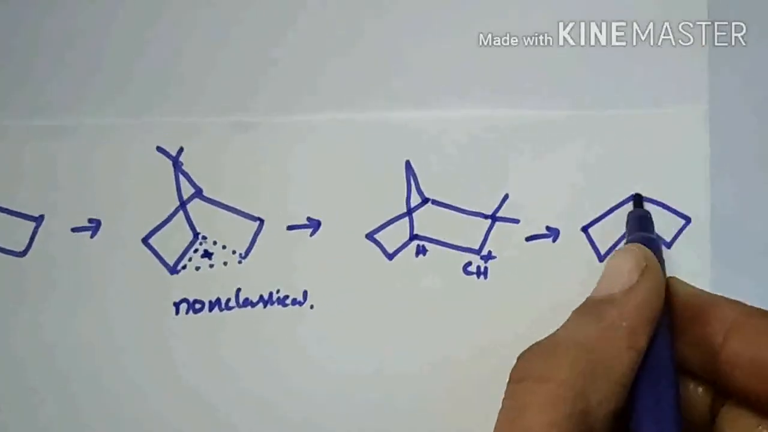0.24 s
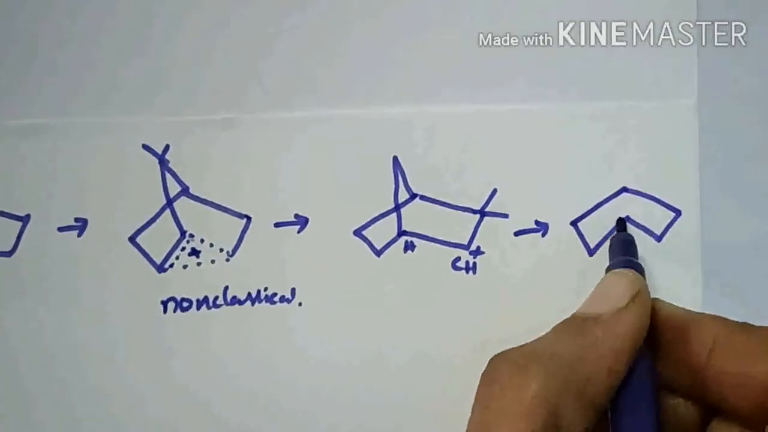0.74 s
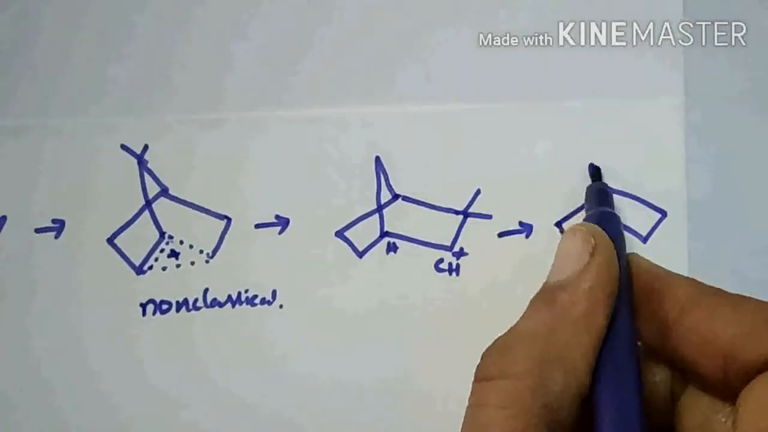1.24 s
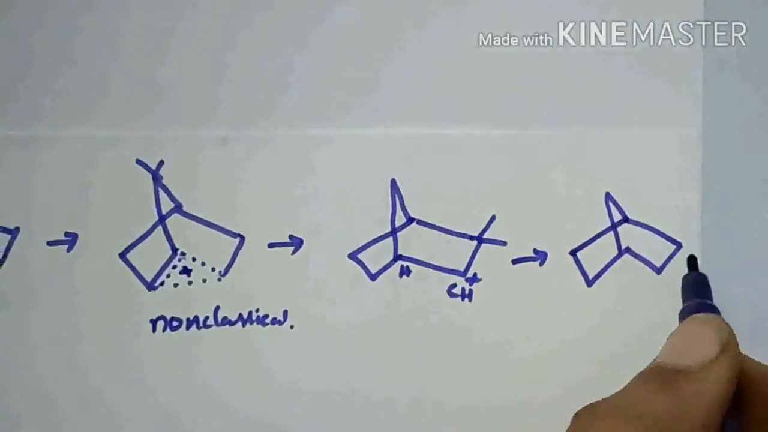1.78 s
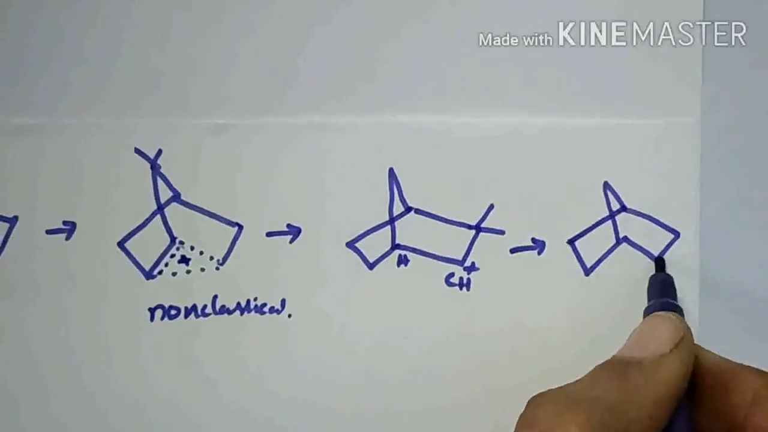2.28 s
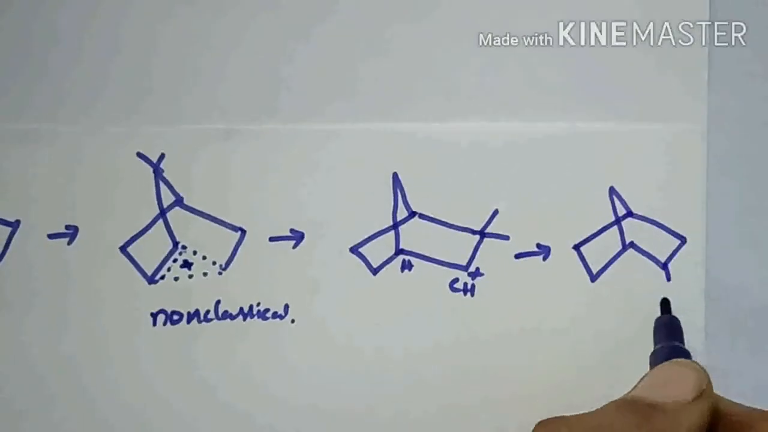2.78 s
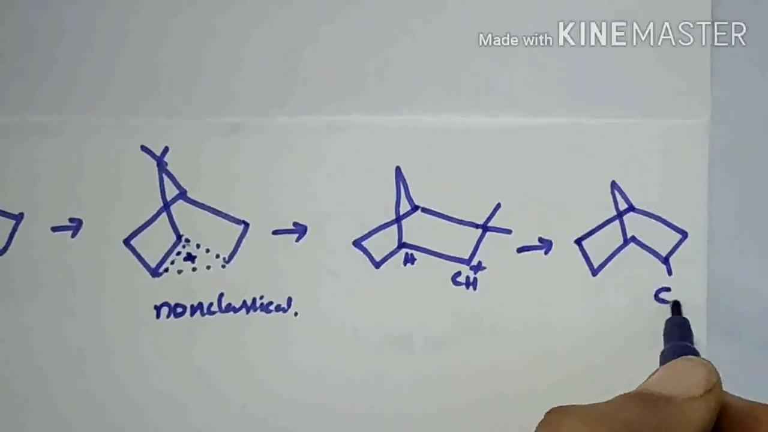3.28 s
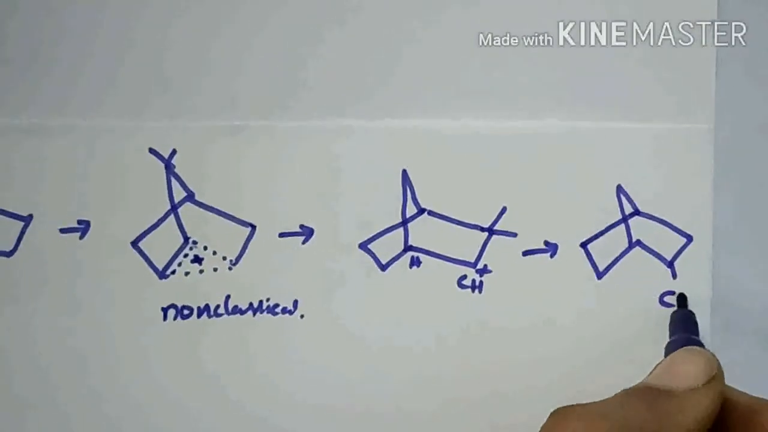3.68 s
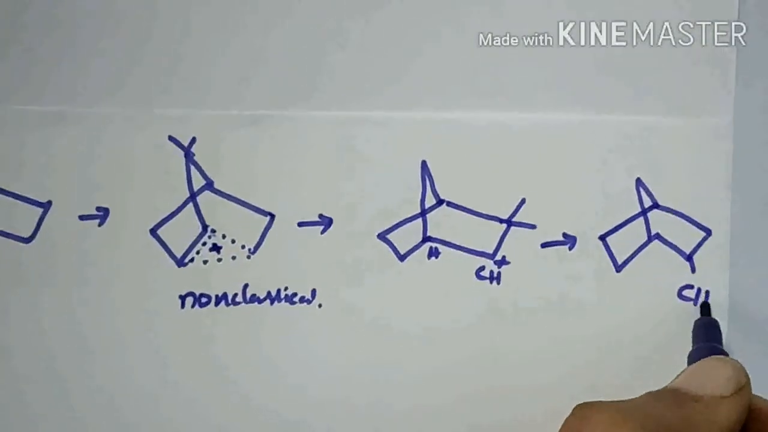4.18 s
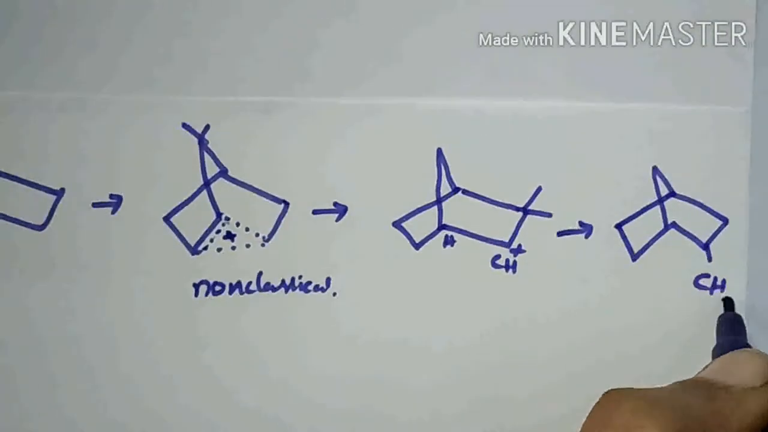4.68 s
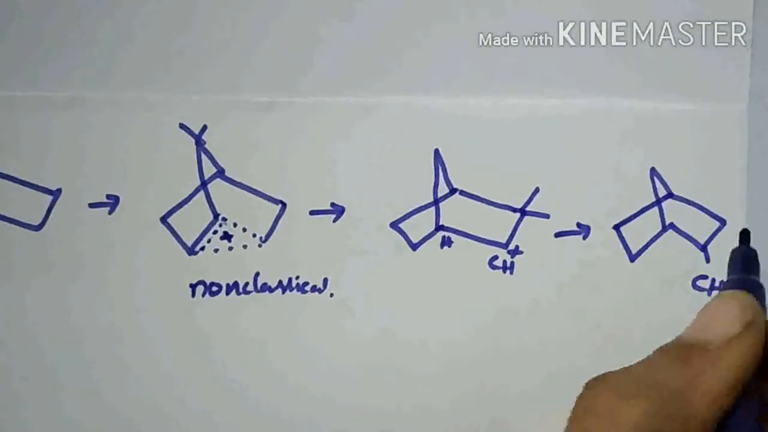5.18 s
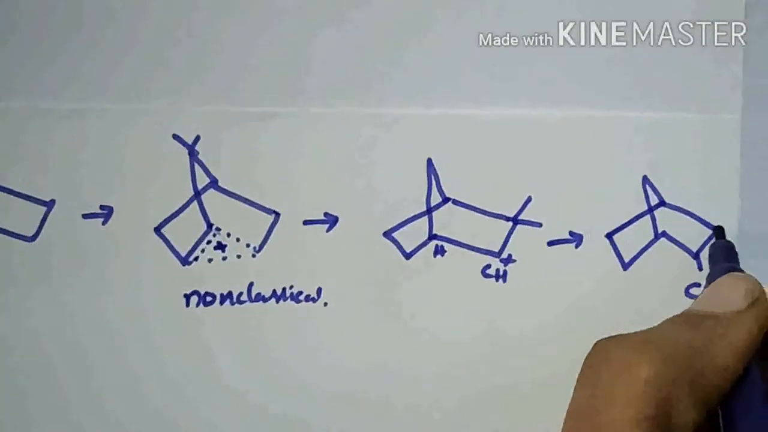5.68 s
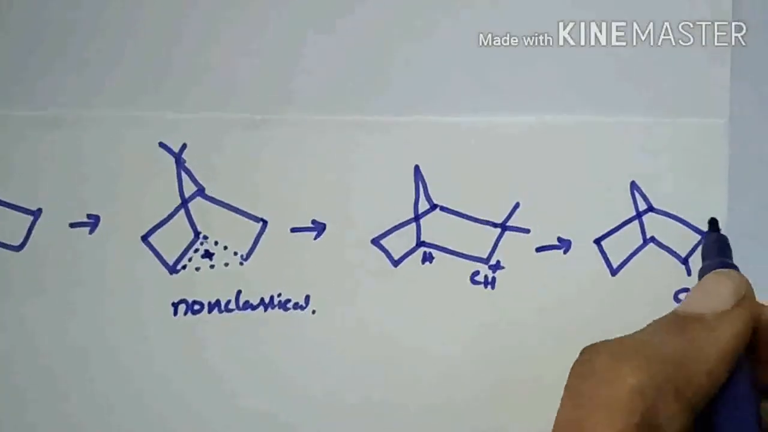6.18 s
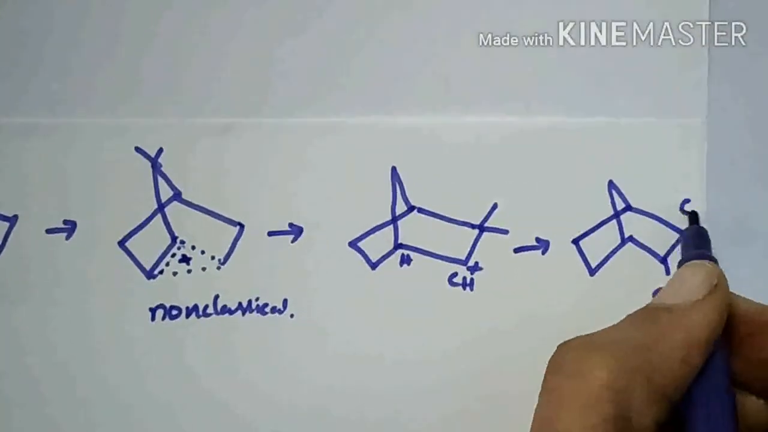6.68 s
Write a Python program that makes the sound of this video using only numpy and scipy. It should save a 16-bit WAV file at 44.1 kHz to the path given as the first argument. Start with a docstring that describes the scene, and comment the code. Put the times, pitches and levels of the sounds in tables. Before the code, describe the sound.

Dry, bright felt scratches come in uneven little groups with gaps between them, strongest within the first second and a half. Later strokes are short and quick, like writing letters, with crisp tip contacts and occasional dull taps on the desk. The close stereo microphone also catches deep room rumble, a boomy hum that comes and goes, faint motor whine and thin hiss.

```python
"""At a desk in a quiet room, a felt-tip marker draws short lines on paper, close to a two-port microphone.
The felt rasps over the paper fibres: random snaps make a bright hiss and set sheet, desk and barrel ringing.
Ticks of dying noise mark the tip's contacts, and single blows knock the desk.
Shaped noise makes the broad rumble, deep rumble, slow air pressure swings and microphone hiss.
Sines make the low boom that swells and the thin motor tones, with narrow bands of wavering noise,
some near the tones and some apart."""
import sys
import numpy as np
from scipy import signal
from scipy.fft import rfft, irfft
from scipy.io import wavfile

SR = 44100
rng = np.random.default_rng(int(sys.argv[2]) if len(sys.argv) > 2 else 0)


def inscribe(sig):
    """Save sig as 16-bit PCM at rate SR to the path in sys.argv[1].

    A 1-D sig is mono; a 2-D sig holds one channel per row.
    Samples are clipped to [-1, 1] before scaling.
    """
    pcm = np.round(np.clip(np.atleast_2d(sig).T, -1, 1) * 32767)
    wavfile.write(sys.argv[1], SR, pcm.astype(np.int16))


N = 306054  # length of the sound in samples

# resonances of the pen barrel: (centre [Hz], width [Hz], relative level [dB])
BARREL_MODES = [(1048, 39, 8), (1710, 33, -12), (2370, 41, -29), (3450, 11, -7.5)]
# resonances of the desk: (centre [Hz], width [Hz], relative level [dB])
DESK_MODES = [(371, 55, -2.5), (738, 86, -7), (890, 160, -4.5), (1260, 83, -28)]


def strokes():
    """The snaps sound as hiss off the tip and drive the resonances of sheet, desk and barrel, which ring on."""
    # colour of the tip hiss: (frequency [Hz], relative level per Hz [dB])
    tip_colour = [(2400, -23), (4000, -23), (4700, -19.5), (5250, 0.5), (5700, -10.5), (6300, -7),
                  (7300, 1.5), (8400, 1.5), (10400, 3), (13000, 4), (14300, -11), (15500, -9.5)]
    # felt resonances added to the plain snaps: (centre [Hz], width [Hz], level [dB])
    felt_modes = [(6590, 92, 7.5), (7250, 49, -14), (8650, 18, -10), (9500, 150, -19), (10040, 43, 6.5),
                  (11700, 120, -9), (14900, 84, -32)]
    # resonances of the paper: (centre [Hz], width [Hz], relative level [dB])
    sheet_modes = [(1360, 720, 12), (1760, 49, 13.5), (2445, 250, 12), (3230, 310, 1.5), (4330, 1300, -4)]
    bright_from_hz = 11000

    tip_gain, bright_gain, sheet_gain, desk_gain, barrel_gain = stroke_levels()
    snaps = fibres()
    felt = patchy(snaps + body(snaps, felt_modes))
    hiss = rms_one(coloured(felt, tip_colour))
    high_pass = signal.butter(2, bright_from_hz, "high", fs=SR, output="sos")
    top = signal.sosfiltfilt(high_pass, hiss)

    sheet = ringing(sheet_gain, snaps, sheet_modes)
    desk = ringing(desk_gain, snaps, DESK_MODES)
    barrel = ringing(barrel_gain, snaps[1], BARREL_MODES)  # one train of snaps for both ports
    tip = tip_gain * (hiss - top) + bright_gain * top
    return tip + sheet + desk + barrel + barrel_gain * squeak() + accents(snaps)


def stroke_levels():
    """All voices of a stroke follow its speed and the uneven drag of the tip."""
    # one row a stroke: (full speed reached [s], run-up [s], hold [s], run-out [s],
    # tip hiss [dB], extra brightness [dB], sheet ring [dB], desk ring [dB])
    stroke_table = [ (0.061, 0.034, 0.057, 0.18, -54.5, -2.5, -58.5, -66.5),
                    (0.277, 0.032, 0.016, 0.06, -71, -6.5, -85, -99),
                    (0.472, 0.023, .004, 0.027, -68.5, -3, -75, -84),
                    (0.892, 0.0054, 0.041, 0.044, -59.5, 6.5, -63.5, -60),
                    (0.95, 0.046, 0.04, 0.094, -44.5, -17, -54.5, -66),
                    (1.271, 0.035, 0.094, 0.078, -59.5, -12, -67.5, -68),
                    (1.528, 0.042, 0.02, 0.13, -65, -1, -73.5, -88),
                    (1.713, 0.021, .01, 0.12, -69, 2, -70.5, -69.5),
                    (1.898, 0.13, 0.055, 0.19, -72, -7, -80, -77),
                    (2.244, 0.019, 0.017, 0.048, -67.5, -4, -92, -83),
                    (2.383, 0.051, 0.03, 0.063, -63.5, -1, -69.5, -67.5),
                    (3.055, 0.022, 0.028, 0.026, -68, 3, -75, -87),
                    (3.152, 0.055, 0.025, 0.12, -61, -1.5, -69.5, -63.5),
                    (3.266, 0.036, 0.023, 0.021, -57.5, -8, -66.5, -76),
                    (3.363, 0.02, 0.006, 0.043, -65, -21, -65.5, -70),
                    (3.643, 0.019, 0.0051, 0.028, -70, 1, -90, -84),
                    (3.738, 0.037, 0.032, 0.059, -60, -3, -70.5, -72),
                    (3.906, 0.0088, 0.012, 0.047, -71, 1, -70, -58),
                    (3.956, 0.017, 0.004, 0.064, -57.5, -5, -81, -58.5),
                    (4.064, 0.027, 0.04, 0.052, -62, -12, -72, -72),
                    (4.257, 0.016, 0.003, 0.04, -66, 2, -72, -84),
                    (4.322, 0.02, 0.013, 0.14, -64.5, -3, -73, -68.5),
                    (4.617, 0.034, 0.02, 0.15, -69.5, -1, -88, -69),
                    (4.754, 0.054, 0.034, 0.038, -73.5, 5, -76, -78),
                    (4.977, 0.042, 0.014, 0.04, -55, 0, -65.5, -72),
                    (5.039, .04, 0.025, 0.026, -62.5, 1, -76, -81),
                    (5.076, 0.014, 0.013, .11, -55, 0, -67.5, -78),
                    (5.164, 0.043, 0.055, 0.093, -63, -10, -72, -77),
                    (5.281, 0.047, 0.03, 0.04, -69.5, -2, -77, -81),
                    (5.354, 0.014, 0.044, 0.11, -66.5, -9, -70, -74),
                    (5.678, 0.017, 0.012, 0.04, -76, 7, -91, -85),
                    (5.896, 0.0079, 0.023, 0.068, -55, -10, -68.5, -55.5),
                    (6.363, 0.007, 0.016, .04, -74, -20, -74, -85),
                    (6.47, 0.011, 0.029, 0.024, -70, 0, -82, -73),
                    (6.573, 0.073, 0.047, 0.033, -65, -2, -79, -67),
                    (6.649, 0.043, 0.042, 0.03, -65.5, 0, -74.5, -76), ]
    # barrel singing: (full speed reached [s], run-up [s], hold [s], run-out [s], level [dB])
    barrel_table = [(0.058, 0.015, 0.03, 0.095, -56.5), (3.165, .04, .01, 0.096, -75),
                    (5.895, 0.012, 0.031, 0.02, -59)]
    drag_db, drags_per_s = 1, 44

    *timing, hiss_db, top_db, sheet_db, desk_db = np.transpose(stroke_table)[:, :, None]
    *barrel_timing, barrel_db = np.transpose(barrel_table)[:, :, None]
    t = np.arange(0, N + 32, 32) / SR  # every 32 samples is fine enough for levels
    drag = from_db(drag_db * np.interp(t * drags_per_s, np.arange(600), rng.standard_normal(600)))
    voices = [speed(*timing, t) * from_db(db) for db in (hiss_db, hiss_db + top_db, sheet_db, desk_db)]
    voices.append(speed(*barrel_timing, t) * from_db(barrel_db))

    levels = []
    for voice in voices:
        together = np.sqrt(np.sum(voice ** 2, axis=0))  # overlapping strokes add as power
        levels.append(np.interp(np.arange(N) / SR, t, drag * together))
    return levels


def speed(s, up_s, hold_s, out_s, t):
    """Gain of a movement that speeds up, holds and slows down."""
    depth_db = 21.5  # level lost one run-up before, or one run-out after, full speed
    up_bend, out_bend = 1.3, 1.15  # powers that curve the rise and fall
    early = np.maximum(s - t, 0) / up_s
    late = np.maximum(t - s - hold_s, 0) / out_s
    loss_db = depth_db * (early ** up_bend + late ** out_bend)
    return from_db(-np.minimum(loss_db, 200))


def fibres():
    """Fibres snap at random under the felt; one train reaches both ports by short paths, the rest is scattered."""
    # paths straight from the tip and off desk and hand:
    # (left base delay [ms], right base delay [ms], left relative gain, right relative gain)
    paths = [(.2, 0, 1, 1), (.55, .75, .5, -.5), (1.3, 1.0, -.4, .4), (2.1, 2.6, .3, .3)]
    fibres_per_s, spread_db = 7000, 2
    clump_db, clumps_per_s = 1, 220  # fibres catch in clumps
    path_wander, wanders_per_s = 0.12, 5  # the moving hand stretches the paths: share of each delay
    direct_share = 0.59  # share of the power

    sizes = from_db(spread_db * np.minimum(rng.exponential(1, (3, N)), 5))
    signs = rng.choice([-1, 1], (3, N))
    clumps = from_db(clump_db * wander(clumps_per_s))
    stretch = 1 + path_wander * wander(wanders_per_s)
    happens = rng.random((3, N)) < fibres_per_s / SR
    direct, *scattered = clumps * sizes * signs * happens

    both = np.zeros((2, N))
    for left_ms, right_ms, left_gain, right_gain in paths:
        both[0] += left_gain * delayed(direct, left_ms, stretch)
        both[1] += right_gain * delayed(direct, right_ms, stretch)
    scattered = rms_one(np.array(scattered))
    return np.sqrt(direct_share) * rms_one(both) + np.sqrt(1 - direct_share) * scattered


def delayed(x, ms, stretch):
    """Reads x late by a delay that stretches and shrinks."""
    delay = np.round(ms * stretch * SR / 1000).astype(int)
    return x[(np.arange(N) - delay) % N]


def patchy(x):
    """As the tip tilts and turns, each third of an octave of the sound swells and fades on its own."""
    patch_db, patches_per_s = 0.9, 20
    edges_hz = 2000 * 2 ** (np.arange(11) / 3)
    steps = np.arange(N) / SR * patches_per_s
    out = 0
    for low, high, chance in zip(edges_hz, edges_hz[1:], rng.standard_normal((10, 400))):
        band = signal.sosfilt(signal.butter(2, [low, high], "band", fs=SR, output="sos"), x)
        level_db = patch_db * np.interp(steps, np.arange(400), chance)
        out = out + from_db(level_db) * band
    return out


def ringing(gain, snaps, modes):
    """The gain shapes the snaps before they enter the resonances, so the ringing lasts beyond the stroke."""
    # the tiny constant keeps the filters away from zero
    return body(gain * snaps + 1e-18, modes) / np.std(body(snaps, modes))


def squeak():
    """The pen squeaks: a wavering near sine around the lowest barrel mode."""
    level_db, waver_hz = -7, 15  # level is relative to the barrel gain
    hz = BARREL_MODES[0][0] + waver_hz * wander(60)
    gain = from_db(level_db + 1.3 * wander(67.6))
    return gain * sine(hz)


def accents(snaps):
    """In some strokes one or several resonances stand out: snaps pass each twice, under the movement's speed."""
    # (full speed reached [s], run-up [s], hold [s], run-out [s], centre [Hz], width [Hz], level [dB])
    accent_table = [(0.048, .03, 0.018, .02, 760, 150, -57), (0.07, .02, 0.044, .12, 3200, 1500, -69),
                    (0.125, 0.018, .045, .04, 1780, 90, -70), (0.918, .012, 0.008, 0.015, 1760, 90, -64),
                    (0.94, .02, .06, .03, 3550, 300, -68), (0.97, 0.033, 0.038, .04, 7600, 900, -59),
                    (0.982, .02, 0.012, 0.02, 2450, 140, -66), (1.258, .015, 0.03, .06, 7000, 1500, -66),
                    (1.32, 0.033, 0.053, .04, 2600, 1400, -75), (1.355, .02, 0.01, .03, 1150, 250, -71),
                    (3.275, .02, .015, .015, 7400, 900, -68.5), (3.907, .004, 0.02, 0.06, 1150, 600, -60),
                    (3.908, .004, .022, .06, 1750, 600, -61), (3.91, .006, 0.022, 0.027, 1960, 70, -66),
                    (3.915, 0.009, 0.022, 0.05, 800, 90, -59), (4.975, .03, .02, .02, 7300, 900, -65),
                    (4.978, .03, .015, .02, 13300, 1500, -61), (5.06, .05, .09, .06, 4300, 3000, -75),
                    (5.077, .008, 0.0092, 0.028, 7450, 900, -64),
                    (5.078, .012, .012, .08, 13000, 2000, -63), (5.893, 0.004, 0.006, 0.025, 350, 140, -60),
                    (5.894, .003, .025, .03, 2600, 2400, -66)]
    out, age = np.zeros((2, N)), np.arange(SR // 4) / SR
    for s, up_s, hold_s, out_s, hz, width, level_db in accent_table:
        at = max(round(s * SR) - SR // 16, 0)  # start early to leave room for the run-up
        piece = slice(at, at + len(age))
        band = rms_one(narrowed(snaps[:, piece], hz, width))
        out[:, piece] += from_db(level_db) * speed(s, up_s, hold_s, out_s, at / SR + age) * band
    return out


def ticks():
    """The tip lands or lifts: each contact is a short burst of dying noise around its own centre."""
    # (time [s], level before the fade [dB], centre [Hz], fade to 1/e [s])
    tick_table = [(0.048, -49.5, 10700, 0.0027), (0.890, -59, 11100, 0.003), (1.715, -60.5, 8700, 0.0061),
                  (2.184, -54, 4740, 0.0014), (2.185, -61, 2760, .002), (2.242, -62, 8500, 0.0026),
                  (2.247, -70, 10000, .0015), (2.252, -66, 9500, .0015), (2.256, -57, 10500, .0015),
                  (3.905, -66, 2370, 0.0084), (3.963, -60, 6500, .002), (4.255, -63, 8340, 0.0049),
                  (5.2047, -51.5, 7610, 0.002), (5.648, -66, 9100, 0.0034), (5.676, -65, 9930, 0.0033),
                  (5.893, -73, 3480, 0.0033), (6.356, -57.5, 12350, 0.0017)]
    # likeness of left and right; height of the first snap over the noise; width as a share of the centre
    alike, snap, width_share = 0.2, 1.8, 0.7
    out, age = np.zeros((2, N)), np.arange(4000) / SR
    for s, level_db, hz, fade_s in tick_table:
        at = round(s * SR)
        noise = pair(*rng.standard_normal((2, 4000)), alike) + snap * (age == 0)
        burst = rms_one(narrowed(noise, hz, width_share * hz))
        out[:, at:at + 4000] += from_db(level_db) * np.exp(-age / fade_s) * burst
    return out


def knocks():
    """Firm landings knock the desk: one blow each into its resonances."""
    # (time [s], blow level [dB])
    knock_table = [(0.049, -28), (0.891, -31), (3.907, -19.5), (5.892, -12)]
    blows = np.full(N, 1e-18)
    for s, level_db in knock_table:
        blows[round(s * SR)] = from_db(level_db)
    return body(blows, DESK_MODES)


def boom():
    """A near sine that swells and wanders over a narrow restless murmur, in one waveform for both ports."""
    # (time [s], pitch [Hz], level [dB])
    boom_curve = [(0.0, 50, -63), (0.3, 50.8, -84), (0.37, 55.2, -53), (0.46, 54.6, -40.5),
                  (0.54, 49.5, -40.5), (0.62, 51.9, -51.5), (0.74, 53.45, -45), (0.86, 54.2, -50),
                  (0.97, 55, -98), (1.06, 53.4, -41), (1.18, 52.1, -43), (1.33, 55.4, -48.5),
                  (1.44, 48, -56), (1.53, 44.8, -77), (1.73, 48.2, -47), (1.8, 48.6, -74),
                  (2.22, 49.6, -52.5), (2.35, 46.9, -74), (2.53, 49.87, -51.5), (3.0, 50.56, -77),
                  (3.16, 49.6, -50), (3.24, 50.5, -66), (3.34, 51.74, -47), (3.52, 49.8, -43.5),
                  (3.68, 49.34, -60), (3.87, 49.7, -54.5), (4.0, 49, -64), (4.15, 49.4, -66),
                  (4.3, 54.8, -74), (4.45, 50, -54), (4.6, 48, -63), (4.8, 47.3, -63), (4.98, 46.76, -68),
                  (5.07, 48.4, -52.5), (5.35, 51.3, -64), (5.5, 50.1, -68), (5.9, 49.1, -62),
                  (6.2, 50, -64), (6.45, 50.2, -63), (6.7, 49.95, -63), (6.94, 47.5, -58)]
    bed_hz, bed_width_hz, bed_db = 56, 2.2, -65.5
    hz, level_db = in_time(boom_curve)
    # the resonances settle for a second before the sound begins
    bed = narrowed(rng.standard_normal(N + SR), bed_hz, bed_width_hz)[SR:]
    return from_db(level_db) * sine(hz) + from_db(bed_db) * rms_one(bed)


def room():
    """Broad rumble: noise whose likeness between left and right changes with pitch."""
    # colour: (frequency [Hz], relative level per Hz [dB])
    room_colour = [(18, -27.5), (30, -21), (40, -6.5), (60, -5.5), (82, -12), (150, -18), (290, -18.5),
                   (355, -23), (520, -26.5), (1000, -31.5), (1380, -33.5), (1900, -40), (2700, -48.5),
                   (6000, -62)]
    # (time [s], level before a 2.5 dB lift [dB])
    room_level = [(0.0, -55), (0.5, -58.5), (0.95, -55), (1.43, -57), (1.89, -58), (3.42, -59.5),
                  (3.67, -61), (6.17, -60.5), (6.59, -61.5), (6.94, -60.5)]
    # (frequency [Hz], left-right likeness [-1 to 1])
    room_alike = [(40, 0.97), (130, 0.93), (330, 0.88), (480, 1), (620, 0.33), (780, 0.36), (1000, 0.74),
                  (1180, -0.4), (1500, -0.67), (2300, 0.49), (4000, -0.23)]
    # (frequency [Hz], left minus right [dB])
    room_balance = [(30, 3), (170, -2.5), (270, 5), (430, -9), (560, -0.5), (720, -4), (900, 6.5),
                    (1100, -0.5), (2300, -1.5), (8000, -5)]
    mid, side = rfft(rng.standard_normal((2, N)))
    ports = panned(pair(mid, side, at_hz(room_alike)), at_hz(room_balance))
    rumble = rms_one(irfft(ports * from_db(at_hz(room_colour)), N))
    return from_db(in_time(room_level)[0] + 2.5) * rumble


def motor_tones():
    """Clean steady sines, and wavering narrow bands made of noise twice through a resonance."""
    # pitches of the sines [Hz]
    tone_hz = [438.7, 487.4, 633.5, 779.8, 974.8]
    # one row a sine: (level [dB], phase lead at the left port [rad])
    tone_table = [(-70, 1.35), (-76.5, 0.7), (-75.5, 2.34), (-77, -0.13), (-76.5, -1.65)]
    # (centre [Hz], width [Hz], level [dB], left-right likeness [-1 to 1])
    band_table = [(115.4, 27.4, -66, 1), (266.2, 22, -73.5, 0.91), (298.4, 24, -71, 1),
                  (391, 31, -75.5, 0.82), (438.2, 23.7, -76, 0.12), (582, 7.7, -80, 0.21),
                  (1080, 7.9, -92, -0.7), (1888, 40, -76.5, -0.83)]
    turn = 2 * np.pi * np.arange(N) / SR
    out = np.zeros((2, N))
    for hz, (level_db, lead) in zip(tone_hz, tone_table):
        out += np.sqrt(2) * from_db(level_db) * np.sin(hz * turn + np.array([[lead], [0]]))
    noise = rng.standard_normal((2, N + SR))
    for hz, width, level_db, alike in band_table:
        narrow = narrowed(pair(*noise, alike), hz, width)
        out += from_db(level_db) * rms_one(narrow[:, SR:])
    return out


def deep():
    """Rumble at the bottom of hearing: low noise under a changing level, in one waveform for both ports."""
    # (time [s], level [dB])
    deep_level = [(0.1, -54), (0.31, -62), (1.11, -55), (1.32, -56), (1.51, -53), (1.59, -62), (2.58, -63),
                  (2.63, -64), (2.98, -66), (3.17, -61), (4.37, -73), (5.8, -62.5), (5.83, -67),
                  (5.99, -47), (6.14, -77), (6.94, -66)]
    band = signal.butter(2, (14, 38), "band", fs=SR, output="sos")  # Hz
    noise = signal.sosfilt(band, rng.standard_normal(N + SR))[SR:]
    return from_db(in_time(deep_level)[0]) * rms_one(noise)


def swings():
    """Air pressure heaving below the range of pitch, stronger at the left port."""
    level_db, left_minus_right_db = -44, 3.6
    noise = pair(*rng.standard_normal((2, N + 2 * SR)), alike=0.95)
    band = signal.butter(3, (1.8, 10), "band", fs=SR, output="sos")  # Hz
    slow = rms_one(signal.sosfilt(band, noise)[:, 2 * SR:])
    return panned(from_db(level_db) * slow, left_minus_right_db)


def mic_hiss():
    """Steady coloured noise, its own in each channel."""
    # colour: (frequency [Hz], relative level per Hz [dB])
    hiss_colour = [(500, -1), (3000, 1), (6000, -2.5), (9000, 0), (13000, -3), (14000, -3.5), (14800, -54)]
    level_db = -73.5  # before the top is cut
    return from_db(level_db) * rms_one(coloured(rng.standard_normal((2, N)), hiss_colour))


def from_db(db):
    """Decibels to gain."""
    return 10 ** (np.asarray(db) / 20)


def rms_one(x):
    """Scales to rms 1, an average power of one."""
    return x / np.sqrt(np.mean(x ** 2) + 1e-20)


def in_time(rows):
    """Columns of a curve at every sample."""
    s, *columns = np.transpose(rows)
    return np.array([np.interp(np.arange(N) / SR, s, column) for column in columns])


def at_hz(points):
    """A spectrum table read at every transform bin, in straight lines over log frequency."""
    hz = np.maximum(np.arange(N // 2 + 1) * SR / N, 1)
    table_hz, values = np.transpose(points)
    return np.interp(np.log(hz), np.log(table_hz), values)


def coloured(x, colour):
    """Gives each frequency its level from a spectrum table."""
    return irfft(rfft(x) * from_db(at_hz(colour)), N)


def wander(rate):
    """A random line with this many new points a second, spread about 1."""
    return np.interp(np.arange(N) / SR * rate, np.arange(3000), rng.standard_normal(3000))


def sine(hz):
    """A sine of rms 1 whose pitch follows hz."""
    return np.sqrt(2) * np.sin(2 * np.pi * np.cumsum(hz) / SR)


def resonance(x, hz, width_hz):
    """Two-pole resonance, gain 1 on top; a narrower one rings longer."""
    r = np.exp(-np.pi * width_hz / SR)
    feed = [(1 - r * r) / 2, 0, (r * r - 1) / 2]
    feedback = [1, -2 * r * np.cos(2 * np.pi * hz / SR), r * r]
    return signal.lfilter(feed, feedback, x)


def narrowed(x, hz, width_hz):
    """Twice through the same resonance, for steeper sides."""
    return resonance(resonance(x, hz, width_hz), hz, width_hz)


def body(x, modes):
    """Resonances side by side, as in a solid thing that rings at several pitches."""
    return sum(from_db(level_db) * resonance(x, hz, width) for hz, width, level_db in modes)


def pair(mid, side, alike):
    """Left and right with the given likeness: mid is shared, side is opposite."""
    return np.sqrt((1 + alike) / 2) * mid + np.sqrt((1 - alike) / 2) * side * np.array([[1], [-1]])


def panned(x, balance_db):
    """Half of the level difference, left minus right, goes to each side."""
    return x * from_db(np.array([[0.5], [-0.5]]) * balance_db)


def scene():
    """Pen, room and low end together."""
    # (frequency [Hz], left minus right [dB])
    pen_balance = [(60, 3), (110, -23), (200, 19), (380, 3), (700, -4.5), (1290, 3.5), (2380, -5),
                   (4400, 0), (8120, 1), (15000, -1.5)]
    pen = strokes() + ticks() + knocks()
    pen = irfft(panned(rfft(pen), at_hz(pen_balance)), N)
    low_end = panned(boom() + deep(), balance_db=2.0)  # slightly louder at the left
    return pen + low_end + room() + motor_tones() + swings()


def record(dry):
    """The microphone adds its hiss; a steep low-pass cuts the top."""
    # order 12, 0.3 dB ripple, 70 dB down above the cutoff at 15550 Hz
    low_pass = signal.ellip(12, 0.3, 70, 15550, fs=SR, output="sos")
    return signal.sosfilt(low_pass, dry + mic_hiss())


dry = scene()
out = record(dry)
inscribe(out)
```